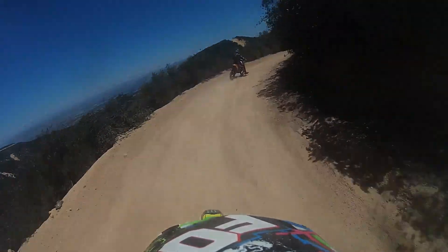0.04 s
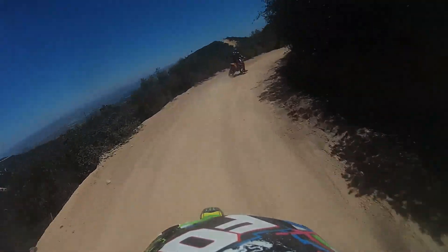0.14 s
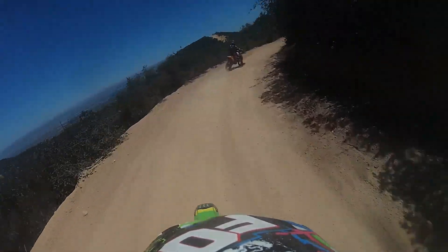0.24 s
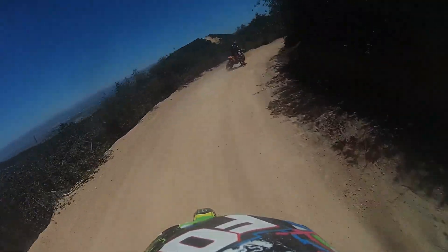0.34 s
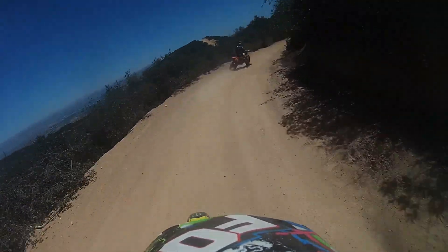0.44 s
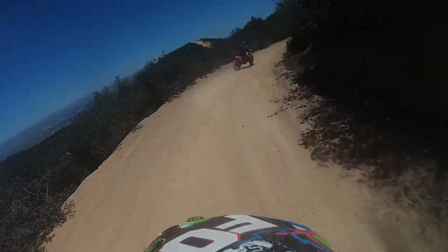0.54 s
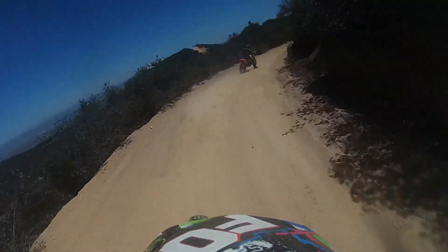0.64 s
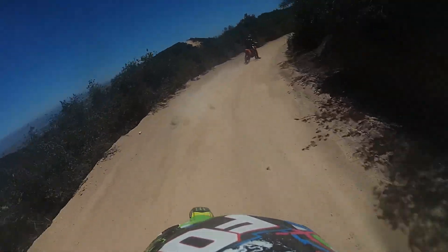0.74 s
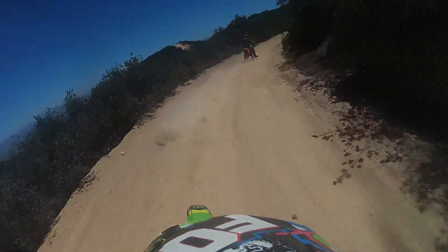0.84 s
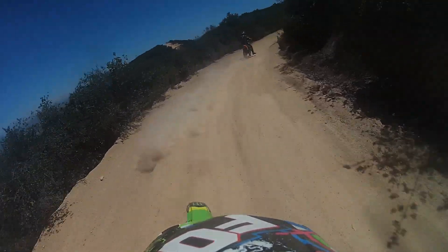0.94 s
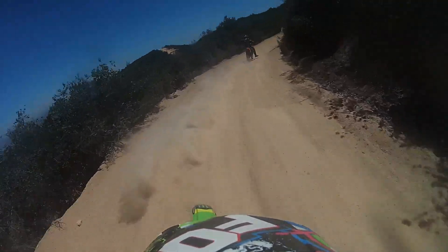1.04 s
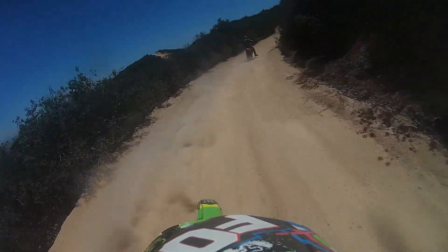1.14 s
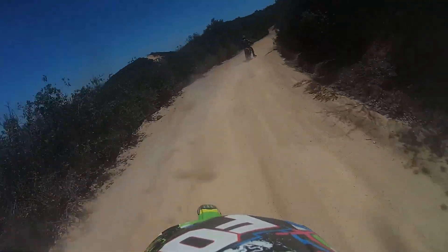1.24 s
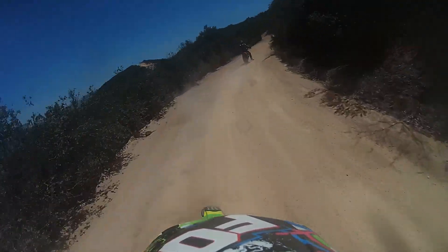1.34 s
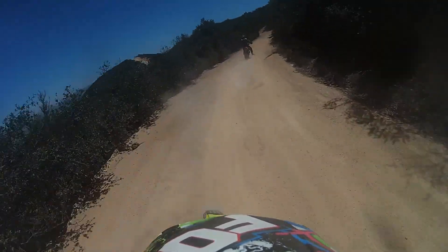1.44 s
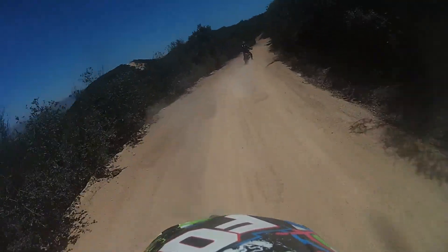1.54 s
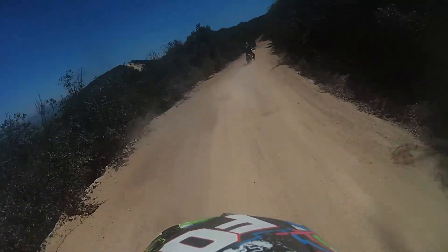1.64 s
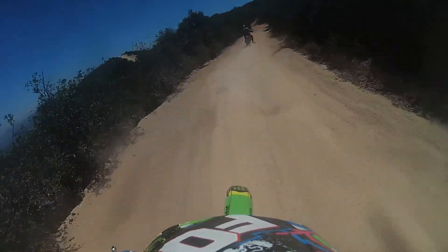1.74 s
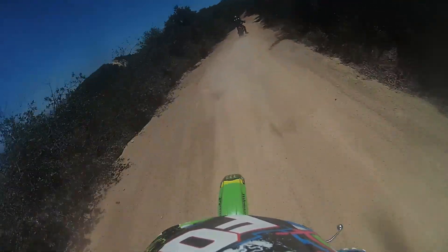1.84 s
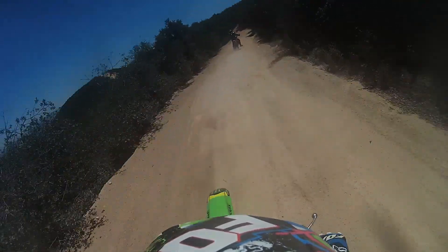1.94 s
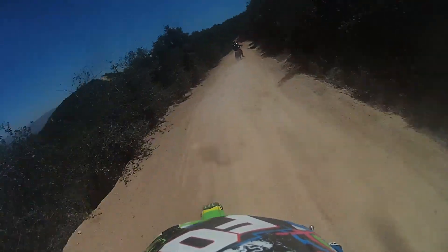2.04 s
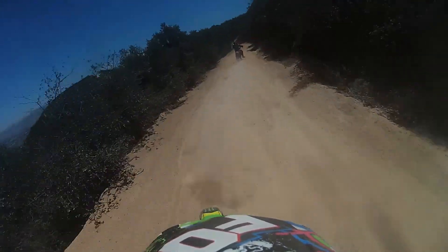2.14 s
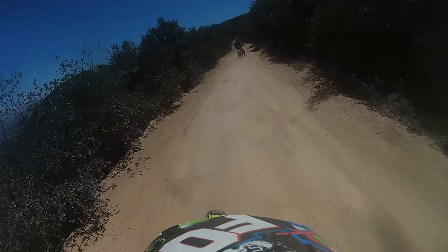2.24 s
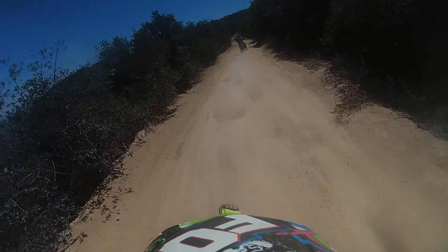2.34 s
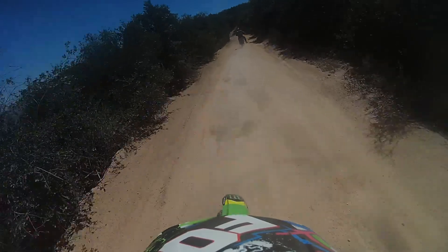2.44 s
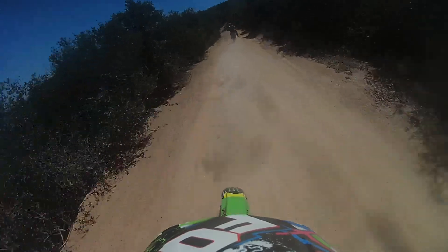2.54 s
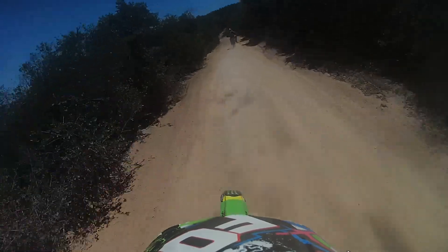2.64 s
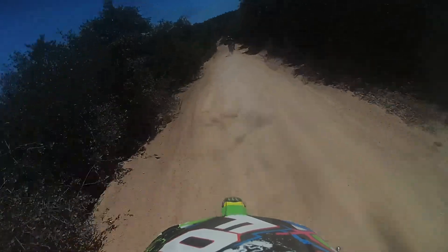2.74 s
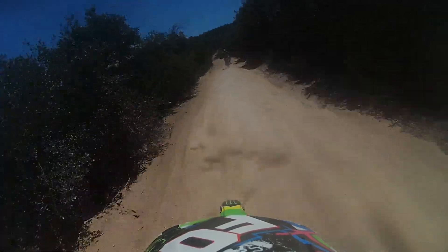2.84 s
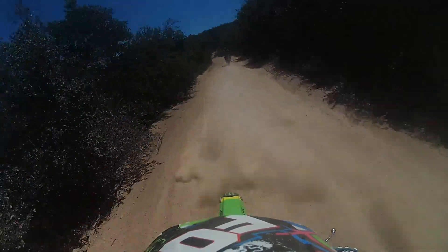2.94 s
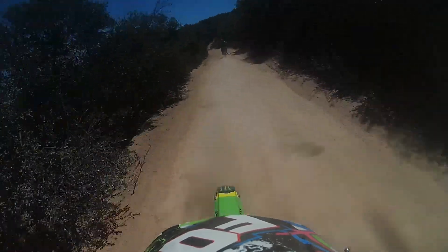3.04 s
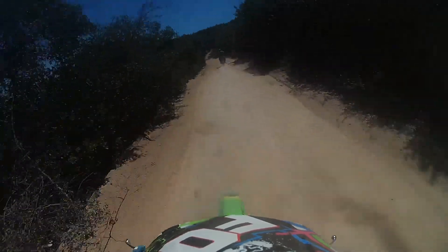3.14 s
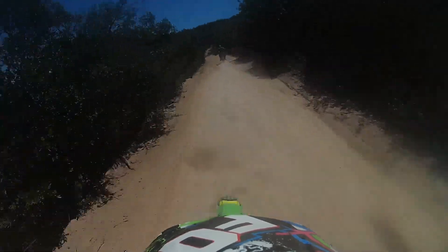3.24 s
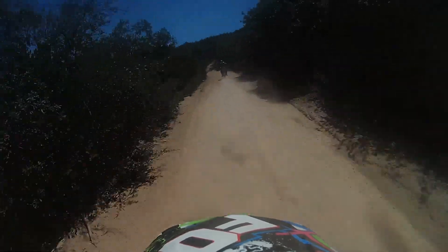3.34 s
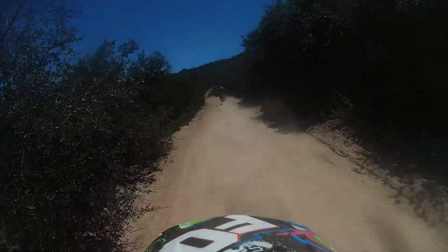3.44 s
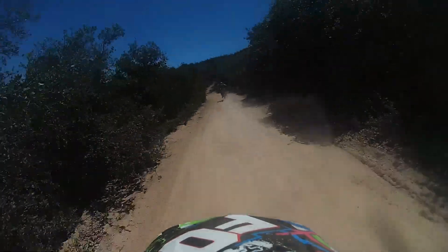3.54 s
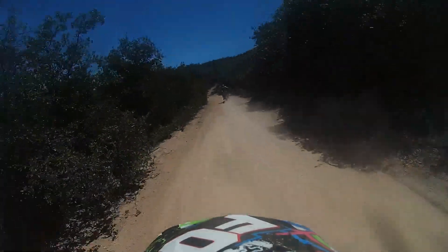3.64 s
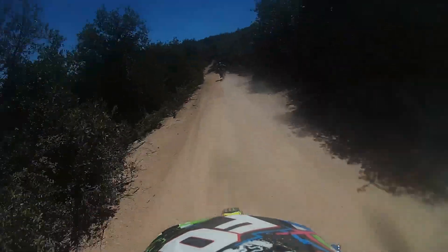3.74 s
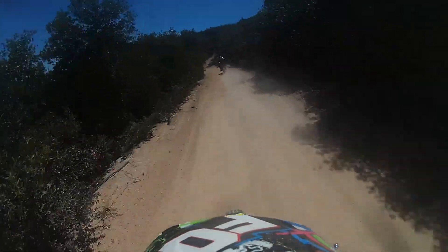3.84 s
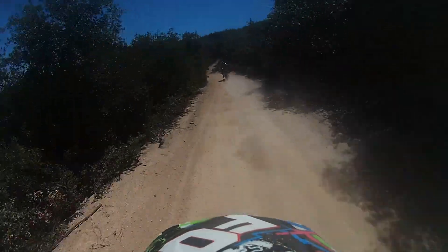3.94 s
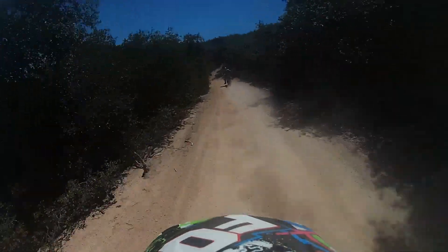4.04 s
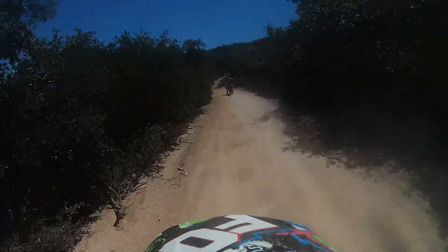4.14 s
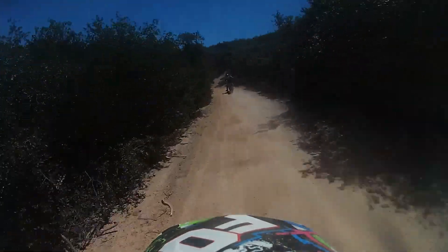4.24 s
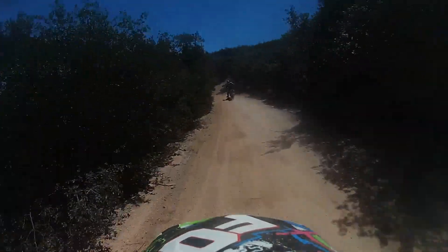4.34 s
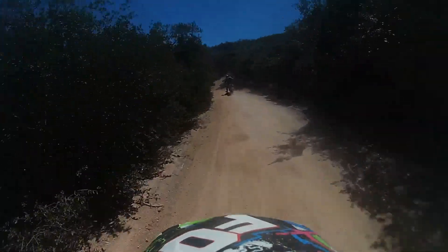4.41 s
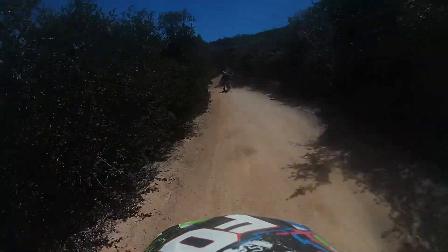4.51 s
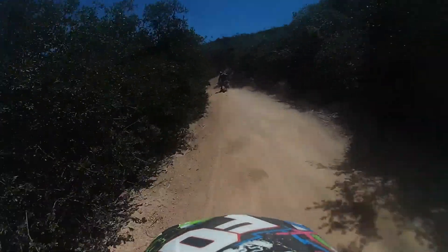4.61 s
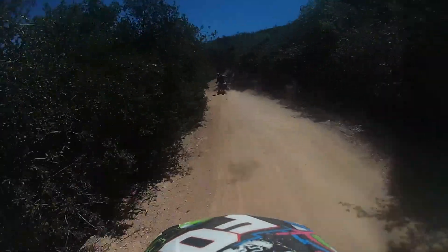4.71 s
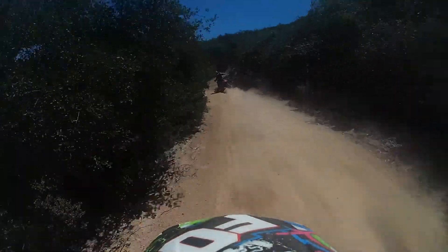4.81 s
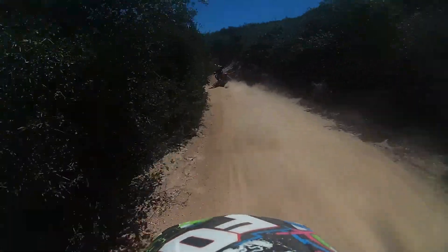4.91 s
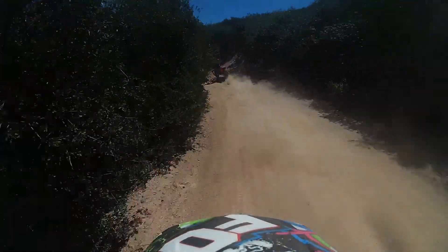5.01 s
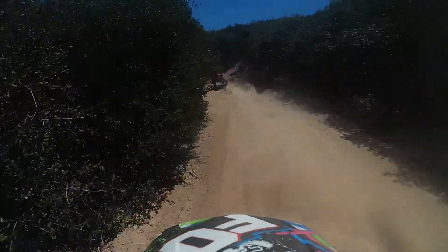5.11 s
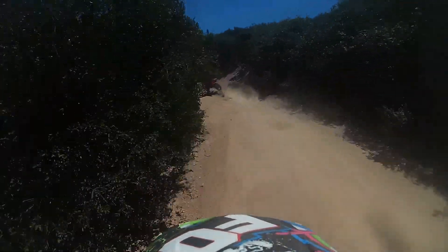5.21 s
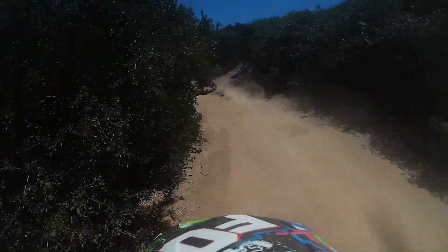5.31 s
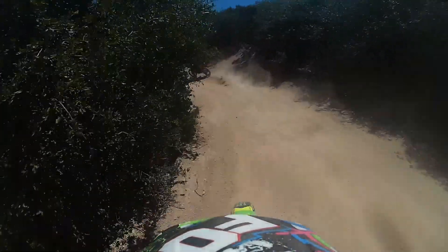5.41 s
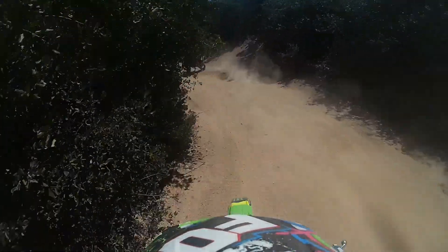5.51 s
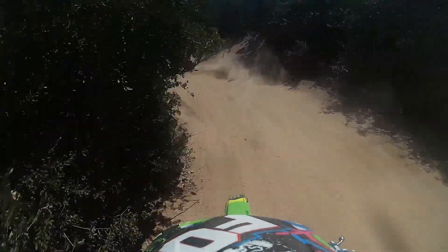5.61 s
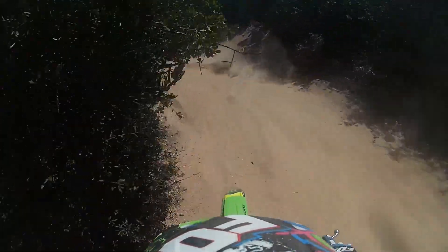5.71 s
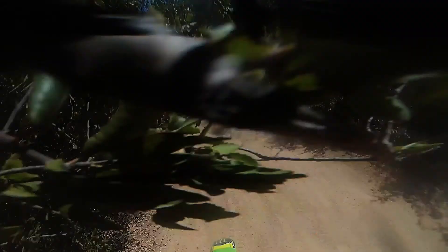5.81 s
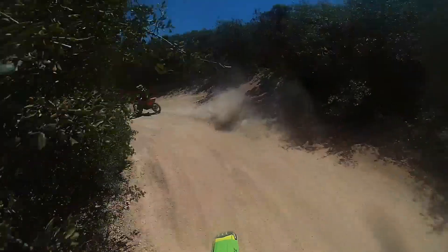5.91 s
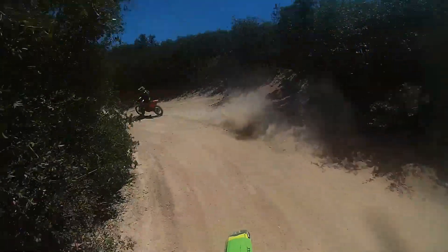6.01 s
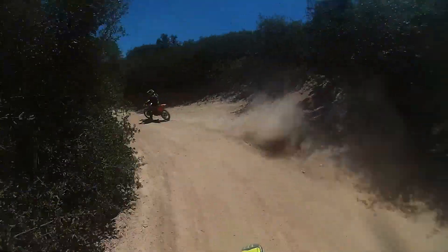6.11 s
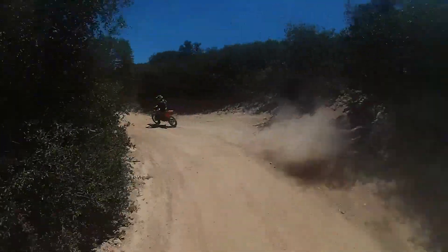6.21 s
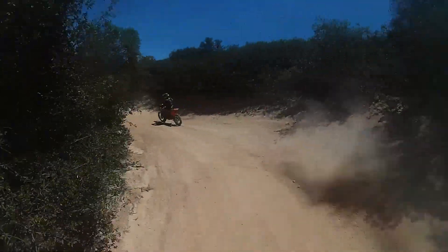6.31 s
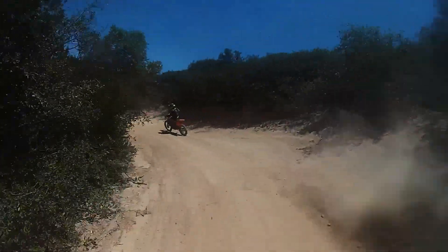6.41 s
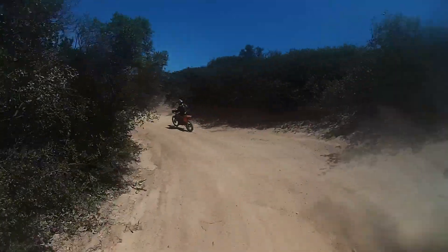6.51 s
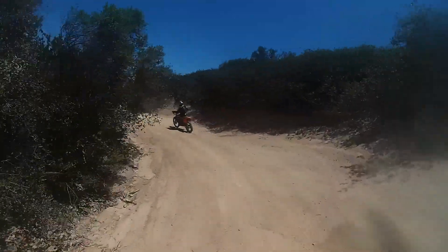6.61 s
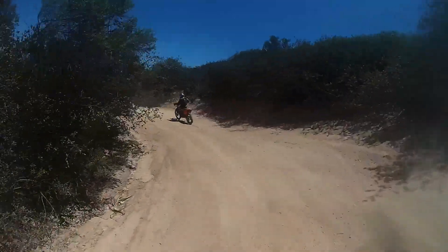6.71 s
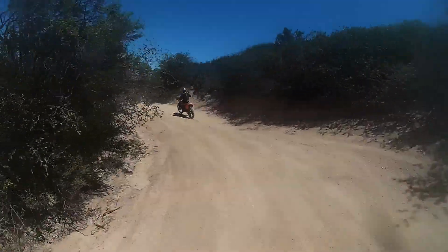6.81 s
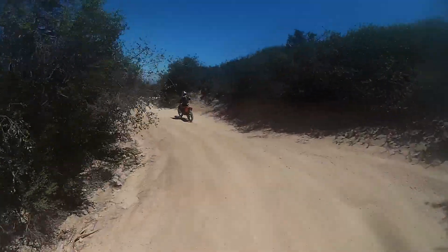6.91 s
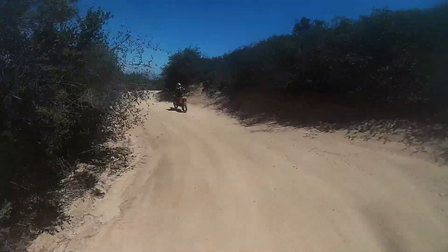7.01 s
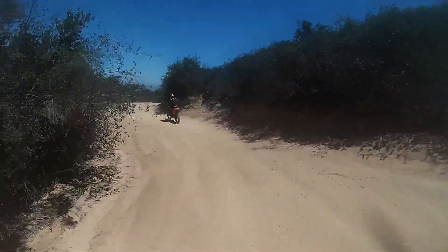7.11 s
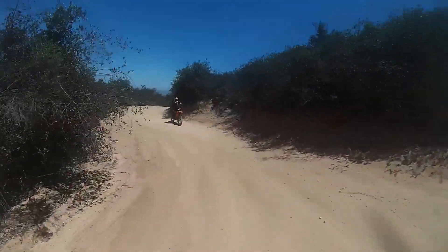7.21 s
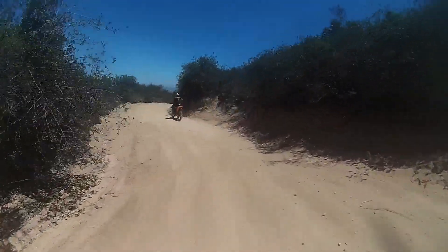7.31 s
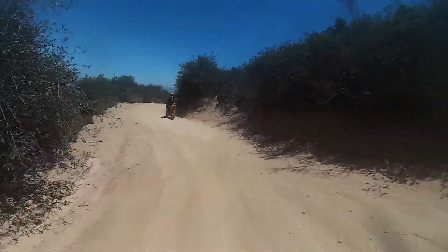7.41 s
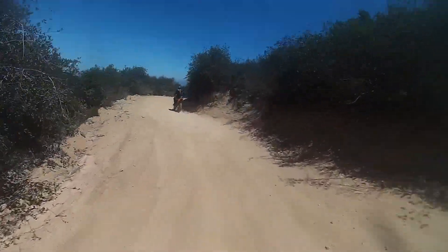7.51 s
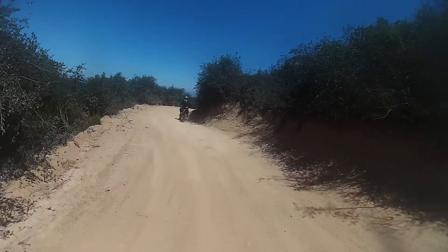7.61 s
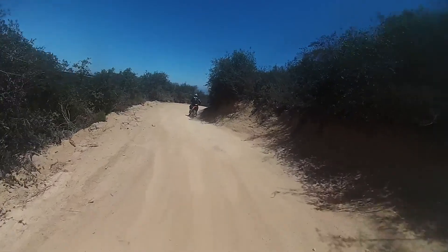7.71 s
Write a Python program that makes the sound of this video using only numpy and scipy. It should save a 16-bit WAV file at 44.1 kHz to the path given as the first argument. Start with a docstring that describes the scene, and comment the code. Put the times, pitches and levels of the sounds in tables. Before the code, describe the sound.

A two-stroke dirt bike rides along a trail outdoors, heard close from a camera on the rider's helmet. The buzzing engine revs up in three swells, the last the highest, over light chain rattle and a few stone ticks. The throttle shuts and the engine drops to a ragged burble as wind bumps the microphone. A branch whips the camera with a loud, sharp crack, then the engine picks up again gently.

```python
"""Dirt bike on a trail

A two-stroke bike climbs a dusty trail, heard from a camera in a plastic case on the rider's helmet.
The throttle opens in three swells, shuts for a bend and opens again. Each firing of the engine sends
a pulse and a puff of gas down the exhaust pipe; the chain rattles and wind nudges the case.
A twig taps the case; later a branch whips it with overloaded cracks, and the mount rings briefly."""
import sys
import numpy as np
from scipy import signal
from scipy.fft import rfft, irfft
from scipy.io import wavfile
from scipy.ndimage import uniform_filter1d

SR = 44100
rng = np.random.default_rng(int(sys.argv[2]) if len(sys.argv) > 2 else 0)


def generate_wav(sig):
    """Save sig (samples, or channels by samples) to the path in sys.argv[1] as 16-bit PCM at SR."""
    pcm = np.round(np.clip(np.atleast_2d(sig).T, -1, 1) * 32767).astype(np.int16)
    wavfile.write(sys.argv[1], SR, pcm)


N = 342216
TIME = np.arange(N) / SR

# tone of the fine ticks after the branch: pitch_hz, level_db
FIZZ_TONE = [(7000, -41), (10000, -5.5), (11700, -0.5), (13000, -10), (15000, -29)]
# lumps of air that hit the case: time_s, level_db, half_width_s
GUSTS = [(1.35, -49, 0.073), (1.54, -46.5, .032), (3.15, -39, 0.018), (3.23, -36.5, 0.061),
         (3.79, -41, 0.057), (4.5, -44, .02), (4.61, -38.5, .028), (4.79, -41.5, 0.036),
         (4.93, -33.5, 0.026), (5.08, -34.5, 0.023), (5.23, -40.5, .031), (5.43, -43.5, 0.083)]
# low rumble of wind on the case: pitch_hz, level_db
WIND_TONE = [(5, -6), (15, 3.5), (35, -4.5), (60, -15), (100, -30), (250, -52), (800, -77)]
# hiss of tyres and air: pitch_hz, level_db
HISS_TONE = [(1000, 3), (3900, 3), (4700, -4.5), (5100, 2), (6000, -3), (6700, 3), (7600, -6.5),
             (8900, -12), (11500, -8), (12800, -12.5), (14000, -23.5)]
# ringing of the chain, its guide and the swing arm: pitch_hz, width_hz, level_db
STEEL_RINGS = [(2350, 600, -3), (3500, 68, -9.5), (3900, 81, -7.5), (3900, 59, 0.5), (4700, 99, -13.5),
               (5060, 60, 1.5), (5200, 230, -5.5), (5516, 160, 3.5), (6700, 260, -5.5), (6965, 310, -7),
               (8230, 360, -8.5), (9800, 710, -13.5), (12130, 1400, -18.5)]
# the slack chain slaps its guide over bumps: start_s, end_s, level_db
CHAIN_SLAPS = [(0, 0.082, -62), (0.169, 0.325, -53.5), (0.903, 1.145, -64.5), (1.946, 2.114, -57.5),
               (2.175, 2.212, -60.5), (3.06, 3.132, -69)]
# stones flicked against the bike: time_s, level_db
STONES = [(0.382, -47), (0.5671, -50.5), (0.627, -54), (0.6874, -59), (0.7505, -51.5), (1.1787, -49.5),
          (1.3337, -57)]
# twigs striking the case: start_s, level_db, decay_s
TWIGS = [(.0032, -16.5, 0.00099), (5.8395, -6, 0.0015), (5.8413, 7.5, 0.0013), (5.8475, -3.5, 0.0038),
         (5.8526, 10.5, 0.0014), (5.859, 5.5, 0.0033), (5.8936, -19, 0.0028), (5.902, -16, 0.0037),
         (5.916, -3.5, 0.0029), (5.919, -12.5, .003), (5.9286, -0.5, 0.0026), (5.935, 4.5, 0.0016)]
# tone of the plastic case: pitch_hz, level_db
CASE_TONE = [(60, -18), (150, -6.5), (340, -5), (470, -7.5), (640, -7.5), (850, -14.5), (1120, -7),
             (1400, 0.5), (1750, -4.5), (2300, 4), (2900, -4), (3700, -4.5), (4600, -13), (6100, -10.5),
             (7500, -18), (12000, -23), (15000, -26.5)]
# the camera rocks on its mount: start_s, level_db, pitch_hz, fade_s (time to fall 60 dB)
JOLTS = [(5.843, -8, 112.5, 0.098), (5.854, -17, 239.5, 0.24), (5.889, -7, 61, 0.11),
         (5.938, -17.5, 80.8, 0.15)]
# ringing of the mount: pitch_hz, level_db, fade_s
MOUNT_RINGS = [(2169, -42, .17), (2972, -36, .19), (3343, -42, .17), (3725, -46, .13), (5647, -43, .22),
               (6616, -52, .14), (7504, -52, .35)]
# engine speed with the throttle open, one firing a turn: time_s, firing_hz
ENGINE_SPEED = [(0, 52), (.78, 54.5), (1, 60.3), (1.18, 64.5), (1.6, 65), (1.7, 70), (1.8, 72.8),
                (1.92, 65.3), (2.05, 63), (2.44, 67.5), (2.52, 74.7), (2.62, 78), (2.71, 86.8),
                (2.89, 94.5), (3.1, 101), (3.25, 91.5), (3.42, 94), (4.45, 85), (4.9, 60), (5.45, 58),
                (6.5, 44), (7.25, 45), (7.6, 51)]
# twists of the throttle: open_s, rise_s, shut_s, opening (0-1), bark_db (boost of the low notes),
# roughness (0-1), rasp_db (extra rasp at full load)
TWISTS = [(.6, 0.34, 1.146, 0.44, 3.5, .12, -4), (1.52, 0.057, 1.82, 0.46, 3, 0.18, -5),
          (1.86, 0.027, 2.11, 0.43, 1, 0.16, -2), (2.24, 0.32, 2.95, 0.89, 0, 0.01, -3),
          (3.045, 0.014, 3.12, 1.0, -3.5, .4, 1), (3.21, 0.015, 3.47, 0.6, -5.5, 0.21, 1),
          (6.77, .04, 6.9, 0.37, 3.5, 0.49, 5.5), (7.23, 0.29, 7.6, 0.42, 0.5, 0.19, -3.5)]
# tone of the exhaust pipe when the engine pulls: pitch_hz, level_db
PIPE_TONE = [(70, -3.5), (95, -18), (140, -33.5), (200, -6.5), (255, 0.5), (305, 4.5), (328, -13),
             (375, -18.5), (455, -4.5), (530, -15), (650, -9.5), (880, -21.5), (1200, -16.5), (1420, -16),
             (1680, -44), (2200, -49)]
# burble of the exhaust, left over when the throttle shuts: pitch_hz, level_db
BURBLE_TONE = [(25, -12), (70, 2), (130, -3.5), (190, -0.5), (250, -5.5), (310, 3.5), (400, -9),
               (520, -13.5), (700, -13.5), (1000, -15.5), (1900, -26.5), (3500, -53)]
# cylinder and pipe wall heard through the case: pitch_hz, level_db
CLATTER_TONE = [(500, -41.5), (900, -19), (1130, -9), (1220, -7), (1320, 1), (1460, 2.5), (1540, -1),
                (1640, -7.5), (1760, -15.5), (2000, -22.5), (3000, -66)]
# bright rasp in the pipe: pitch_hz, level_db
RASP_TONE = [(1200, -13.5), (1750, -2.5), (2050, -3.5), (2220, -1.5), (2380, -5.5), (2590, 3.5),
             (2800, -7.5), (3150, -10.5), (3600, -14), (4400, -15.5), (4700, -19), (5050, -13), (6000, -21),
             (6800, -22), (8800, -29), (12500, -38), (14500, -47.5)]
# the clatter swells briefly: time_s, added_db, half_width_s
CLATTER_SWELLS = [(.4, 4, 0.26), (1.709, 3.5, .09), (3.2, 4, .35), (4.33, 4, 0.12)]
# engine, wind and chain dip briefly in level: time_s, change_db, half_width_s
DIPS = [(5.68, -2, .08), (7.14, -2.5, .11)]

# how loud each part is: cruise_db (throttle shut), doubling_db (per doubling of speed), full_load_db
HISS_LEVEL, CHAIN_LEVEL = (-71, 3.6, 1.4), (-76.5, 6.5, 2.6)
NOTE_LEVEL, BURBLE_LEVEL = (-42, 6.3, 0.48), (-53.5, 5.5, 0.33)
CLATTER_LEVEL, RASP_LEVEL = (-54, 4.5, 2.4), (-60, 8.9, 5.24)
BARK_COLUMN, ROUGH_COLUMN, RASP_COLUMN = 4, 5, 6  # in TWISTS


def gain_of(db):
    """Turns decibels into a number to multiply by."""
    return 10 ** (np.asarray(db) / 20)


def evened(x):
    """Sets the overall level (rms) to one."""
    return x / np.sqrt(np.mean(x ** 2) + 1e-20)


def steadied(x, size=4001):
    """Holds the running level at one, keeping the fast texture."""
    return x / np.sqrt(uniform_filter1d(uniform_filter1d(x ** 2, size), size) + 1e-12)


def colour(x, tone, size=4096):
    """Filters a sound to follow a tone table; any ringing comes after the hit, never before."""
    hz, db = np.transpose(tone)
    bins = abs(np.fft.fftfreq(size, 1 / SR))
    curve_db = np.interp(np.log(bins + 1), np.log(hz + 1), db)
    response = np.exp(np.conj(signal.hilbert(np.log(gain_of(curve_db)))))
    taps = np.fft.ifft(response).real
    return signal.oaconvolve(x, taps[:size // 2])[:N]


def wander(rate_hz):
    """A random drift of level one, no faster than rate_hz."""
    keep = np.fft.rfftfreq(N, 1 / SR) < rate_hz
    return evened(irfft(rfft(rng.standard_normal(N)) * keep, N))


def since(s):
    """Seconds after a moment: zero before it, and at most one."""
    return np.clip(TIME - s, 0, 1)


def hump(s, width_s):
    """A smooth rise and fall around a moment."""
    return np.exp(-((TIME - s) / width_s) ** 2)


def scatter(x, decay_s, wet_db, size=1500):
    """Adds a dense cluster of short echoes."""
    tail = rng.standard_normal(size) * np.exp(-TIME[:size] / decay_s)
    return x + gain_of(wet_db) * signal.oaconvolve(x, tail / np.linalg.norm(tail))[:N]


def loudness(level, speed, load, cruise_hz=60):
    """A part gets louder with engine speed and with load (how hard the engine pulls)."""
    cruise_db, doubling_db, load_db = level
    return gain_of(cruise_db + doubling_db * np.log2(speed / cruise_hz) + load_db * load)


def per_twist(column):
    """One throttle setting, held through each twist and sliding to the next."""
    times, values = zip(*[(s, twist[column]) for twist in TWISTS for s in (twist[0], twist[2])])
    return np.interp(TIME, times, values)


def fizz(level_db=-52, middle_s=6.3, width_s=.33, ticks_per_s=120):
    """Faint high ticks in the bend, perhaps dust landing on the case."""
    ticks = rng.standard_normal(N) * (rng.random(N) < ticks_per_s / SR)
    patter = colour(scatter(ticks, decay_s=.002, wet_db=8), FIZZ_TONE)
    return gain_of(level_db) * hump(middle_s, width_s) * patter


def wind(speed, load, breeze_db=-56, lumpy_db=3):
    """Lumps of air thud on the case, over a light uneven rumble and a hiss that grows with speed."""
    lumps = sum(gain_of(db) * hump(s, width) for s, db, width in GUSTS)
    breeze = gain_of(breeze_db + lumpy_db * wander(4.4))
    rumble = steadied(colour(rng.standard_normal(N), WIND_TONE, size=16384), size=2001)
    hiss = evened(colour(rng.standard_normal(N), HISS_TONE))
    return np.hypot(lumps, breeze) * rumble + loudness(HISS_LEVEL, speed, load) * hiss


def steel(blows):
    """Blows make the steel parts around the chain ring."""
    t = TIME[:2048]
    ring = sum(gain_of(db) * width * np.exp(-np.pi * width * t) * np.sin(2 * np.pi * hz * t)
               for hz, width, db in STEEL_RINGS)
    return signal.oaconvolve(blows, ring / abs(ring).max())[:N]


def slap(start, end, db, attack_s=0.014, build_db=6, release_s=0.028):
    """Strength of one spell of chain slap: it builds to its end, then stops short."""
    rising_db = build_db * np.clip((TIME - end) / (end - start), -1, 0)
    onset = np.minimum(since(start) / attack_s, 1)
    return gain_of(db + rising_db) * onset * np.exp(-since(end) / release_s)


def chain(speed, load, links_per_s=102, decay_links=0.72):
    """Links tick and slap on the chain guide and ring the steel."""
    links = np.cumsum(links_per_s * (1 + 0.049 * wander(37))) / SR
    scrape = np.exp(-(links % 1) / decay_links) * rng.standard_normal(N)
    slaps = sum(slap(*row) for row in CHAIN_SLAPS)
    return np.hypot(loudness(CHAIN_LEVEL, speed, load), slaps) * steadied(steel(scrape))


def stones():
    """Stones flicked up by the tyres ring the same steel."""
    ticks = np.zeros(N)
    for s, db in STONES:
        ticks[round(s * SR)] = gain_of(db)
    return steel(scatter(ticks, decay_s=0.0053, wet_db=10.5))


def branch(crack_db=8, rattle_db=-30, rattle_s=0.0088):
    """Twigs slap the case one after another; the mount rocks and rings."""
    force = np.zeros(N)
    for s, db, decay_s in TWIGS:
        rattle = gain_of(rattle_db) * np.exp(-since(s) / rattle_s)
        force += gain_of(db) * (TIME > s) * (np.exp(-since(s) / decay_s) + rattle)
    cracks = gain_of(crack_db) * colour(force * rng.choice([-1, 1], N), CASE_TONE)
    rocking = sum(gain_of(db - 60 * since(s) / fade_s) * np.sin(2 * np.pi * hz * since(s))
                  for s, db, hz, fade_s in JOLTS)
    free_s = since(TWIGS[-1][0])  # the mount rings freely once the last twig has slipped off
    ring = sum(gain_of(db - 60 * free_s / fade_s) * np.sin(2 * np.pi * hz * free_s)
               for hz, db, fade_s in MOUNT_RINGS)
    return cracks + rocking + ring


def throttle(release_s=0.11, sag_share=.145, sag_s=.022, rough_shut=.9):
    """Each twist builds the load; when the throttle shuts, the engine slows and burns raggedly."""
    load, held = np.zeros(N), np.zeros(N)
    for open_s, rise_s, shut_s, opening, *_ in TWISTS:
        rise = np.clip((TIME - open_s) / rise_s, 0, 1)
        load = np.maximum(load, opening * rise * np.exp(-since(shut_s) / release_s))
        held[(TIME > open_s) & (TIME < shut_s)] = 1
    keep = np.exp(-1 / (sag_s * SR))
    grip = signal.lfilter([1 - keep], [1, -keep], held)  # the engine follows the hand a little late
    rough = np.clip(rough_shut + (per_twist(ROUGH_COLUMN) - rough_shut) * grip, 0, 1)
    speed = np.interp(TIME, *np.transpose(ENGINE_SPEED)) * (1 - sag_share * (1 - grip))
    return speed, load, rough


def crank(speed, rough, flutter=.03):
    """Counts the engine's turns; the rougher the burn, the less even its speed."""
    return np.cumsum(speed * (1 + flutter * rough * wander(40))) / SR


def firings(turns, rough, jitter_s=.0005, puff_turns=0.88, leak=1.0):
    """One pressure pulse each turn, and the strength of the puff of gas that follows it."""
    starts = np.flatnonzero(np.diff(np.floor(turns)))
    strength, late = rng.standard_normal((len(starts), 2)).T
    shift = np.round(late * rough[starts] * jitter_s * SR).astype(int)
    pulses = np.zeros(N)
    pulses[np.clip(starts + shift, 0, N - 1)] = np.exp(.5 * rough[starts] * np.clip(strength, -2, 2))
    return pulses, leak + np.exp(-(turns % 1) / puff_turns)


def pulses_and_gas(pulses, puffs, tone, gas_share):
    """Pulses and rushing gas take on the same tone; gas_share is the gas's part of the power."""
    buzz = steadied(colour(pulses - uniform_filter1d(pulses, size=2001), tone))
    gas = steadied(colour(puffs * rng.standard_normal(N), tone))
    return np.sqrt(1 - gas_share) * buzz + np.sqrt(gas_share) * gas


def exhaust_note(turns, speed, count=26, shimmer_db=2.5, bark_fade_hz=(330, 450), unsteady=0.08):
    """Multiples of the firing rate glide through the pipe's ringing pitches, each wavering alone."""
    moments, firing_hz = TIME[::256], speed[::256]
    bark_db = per_twist(BARK_COLUMN)[::256]
    pipe_hz, pipe_db = np.transpose(PIPE_TONE)
    note = np.zeros(N)
    for k in range(1, count + 1):
        waver = evened(uniform_filter1d(rng.standard_normal(len(moments)), size=7))
        low = np.interp(k * firing_hz, bark_fade_hz, [1, 0])
        level_db = np.interp(k * firing_hz, pipe_hz, pipe_db) + low * bark_db + shimmer_db * waver
        wave = np.cos(2 * np.pi * (k * turns + rng.random()))
        note += np.interp(TIME, moments, gain_of(level_db)) * wave
    return evened(note * (1 + unsteady * wander(45)))  # no two strokes burn alike


def engine(speed, load, rough, power_band_hz=69.7, spread_hz=4.9, power_band_db=2.5):
    """The exhaust note firms up under load; each firing also rattles the cylinder and rasps the pipe."""
    turns = crank(speed, rough)
    pulses, puffs = firings(turns, rough)
    knocks = scatter(pulses, decay_s=0.0087, wet_db=15.5)
    # at high revs the engine hits its power band and clatters harder
    in_band = .5 + .5 * np.tanh((speed - power_band_hz) / spread_hz)
    swell_db = power_band_db * in_band + sum(db * hump(s, width) for s, db, width in CLATTER_SWELLS)
    gas_share = .64 + .27 * rough
    note = load * exhaust_note(turns, speed)
    burble = pulses_and_gas(pulses, puffs, BURBLE_TONE, gas_share=1.0)
    clatter = gain_of(swell_db) * pulses_and_gas(pulses, puffs, CLATTER_TONE, gas_share)
    rasp = gain_of(load * per_twist(RASP_COLUMN)) * pulses_and_gas(knocks, puffs, RASP_TONE, gas_share)
    parts = [(NOTE_LEVEL, note), (BURBLE_LEVEL, burble), (CLATTER_LEVEL, clatter), (RASP_LEVEL, rasp)]
    return sum(loudness(level, speed, load) * sound for level, sound in parts)


def scene():
    """Everything meets at one microphone."""
    speed, load, rough = throttle()
    ride = engine(speed, load, rough) + wind(speed, load) + chain(speed, load) + stones()
    dip_db = sum(db * hump(s, width) for s, db, width in DIPS)
    return (gain_of(dip_db) * ride + branch() + fizz())[None]


def record(dry, threshold_db=-22, squeeze=0.48, recovery_db_per_s=170, top_hz=15300):
    """The volume turns itself down after the cracks, whose peaks overload; the top treble is cut."""
    power = signal.lfilter([1 / 400], [1, 1 / 400 - 1], dry[0] ** 2)  # smoothed over about 9 ms
    power_db = 10 * np.log10(power + 1e-12)
    fall_db = TIME * recovery_db_per_s
    held_db = np.maximum.accumulate(power_db + fall_db) - fall_db  # jumps up, sinks back slowly
    over_db = np.maximum(held_db - threshold_db, 0)
    duck_db = squeeze * signal.lfilter([1 / 900], [1, 1 / 900 - 1], over_db)  # lags about 20 ms
    clipped = np.clip(dry * gain_of(-duck_db), -1, 1)
    treble_cut = signal.firwin(255, top_hz, window=("kaiser", 7), fs=SR)
    return signal.oaconvolve(clipped, treble_cut[None], "same")


dry = scene()
out = record(dry)
generate_wav(out)
```